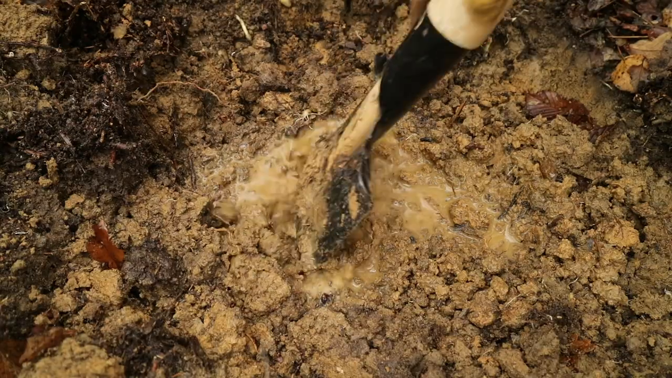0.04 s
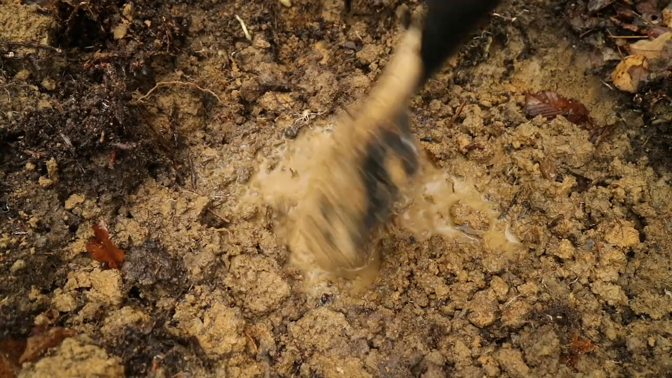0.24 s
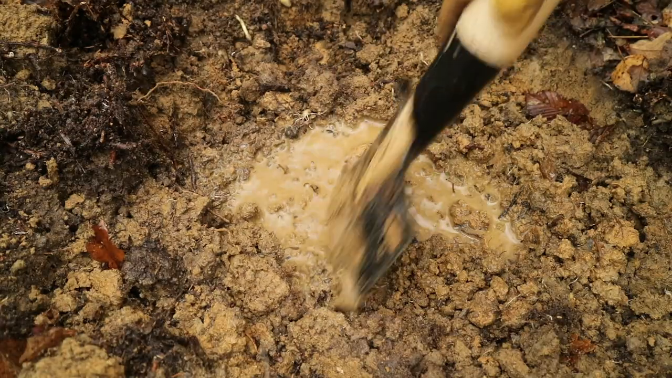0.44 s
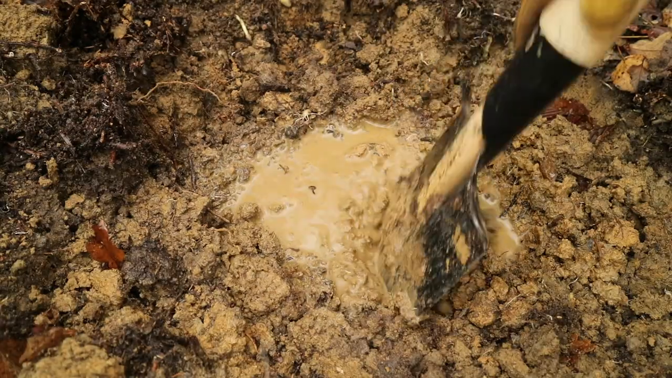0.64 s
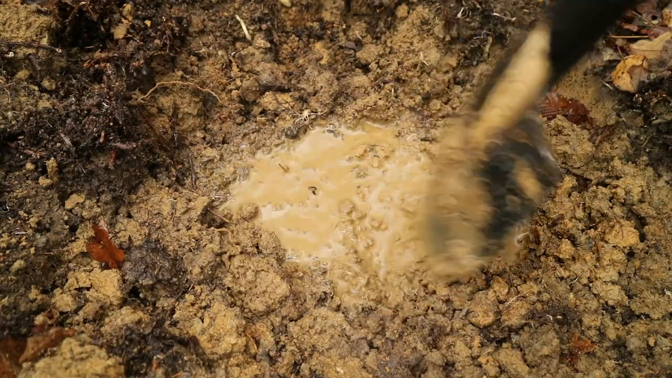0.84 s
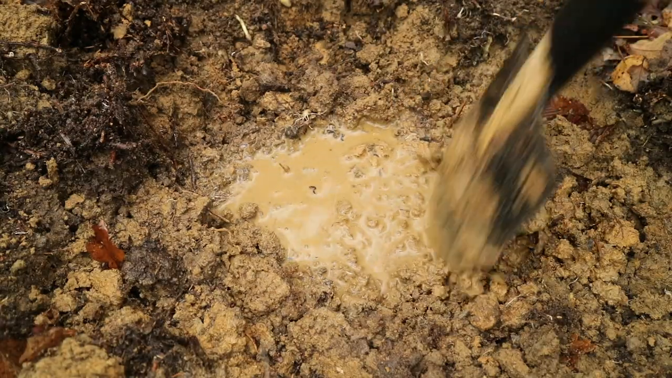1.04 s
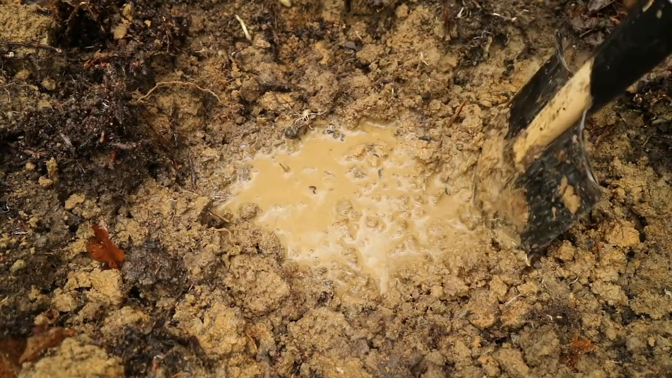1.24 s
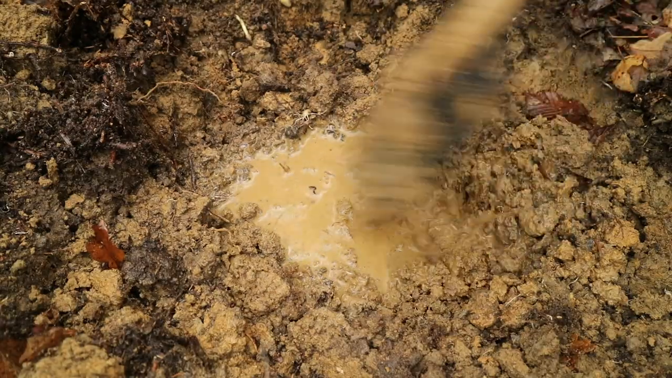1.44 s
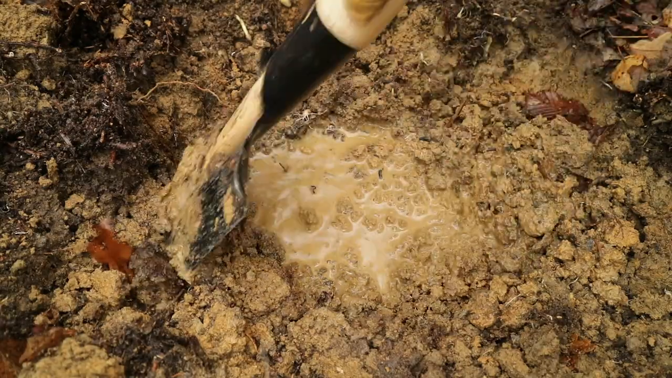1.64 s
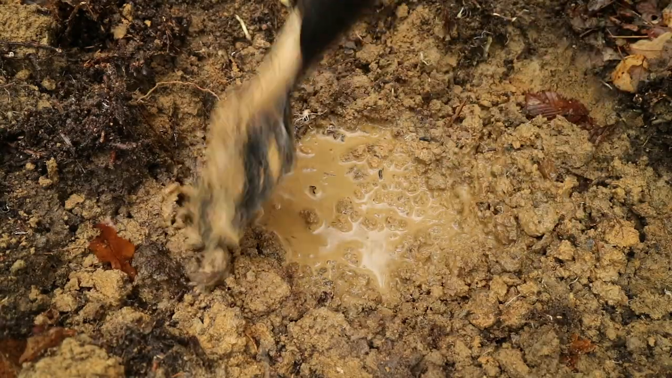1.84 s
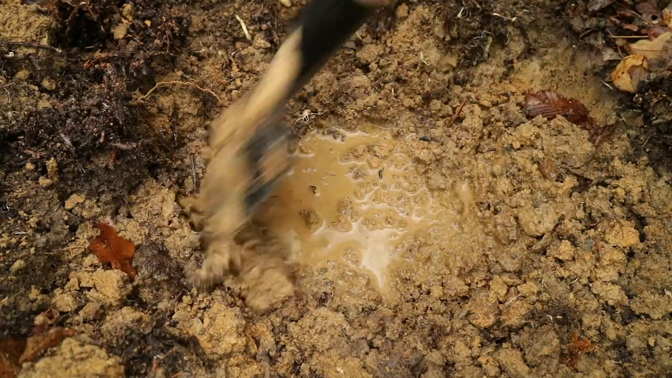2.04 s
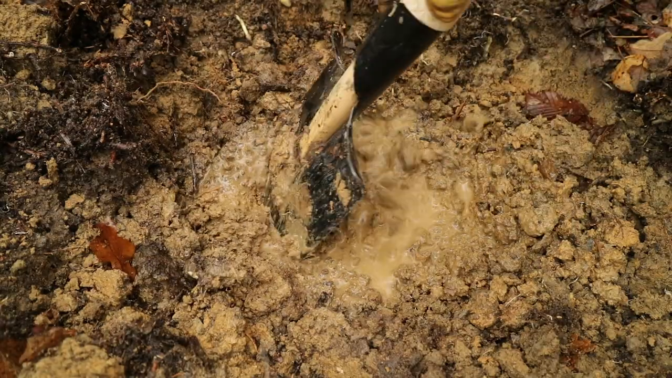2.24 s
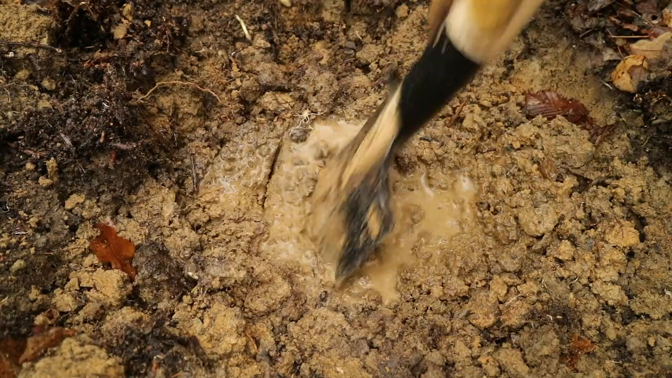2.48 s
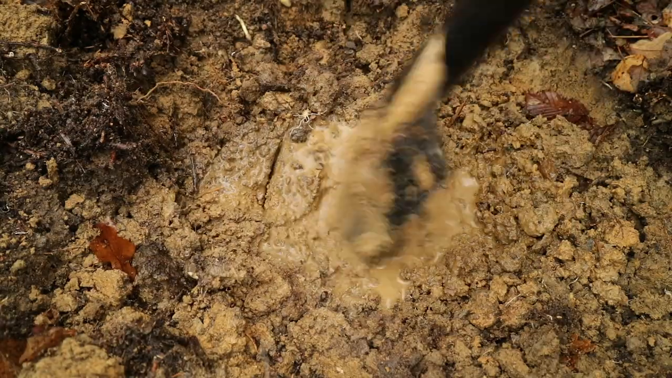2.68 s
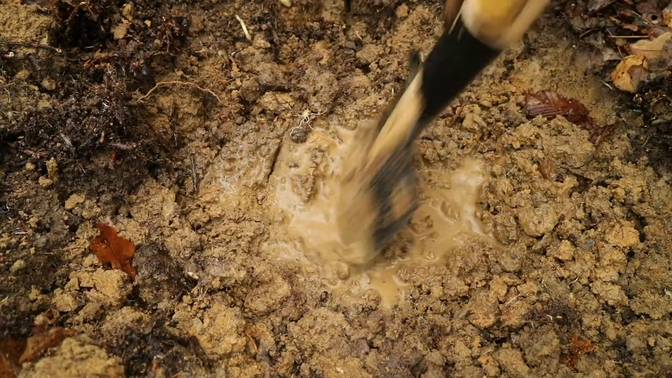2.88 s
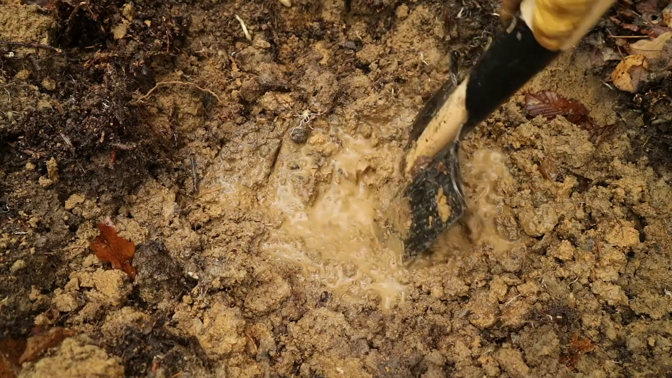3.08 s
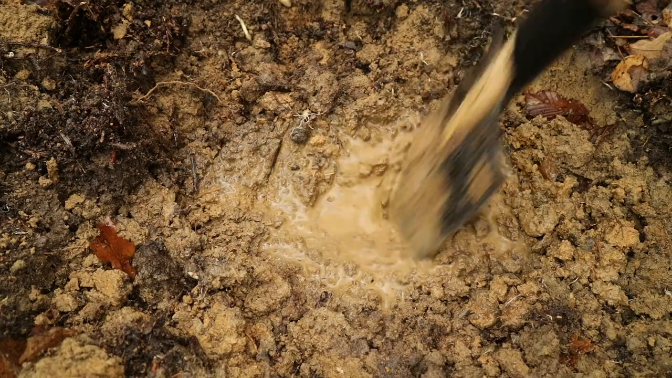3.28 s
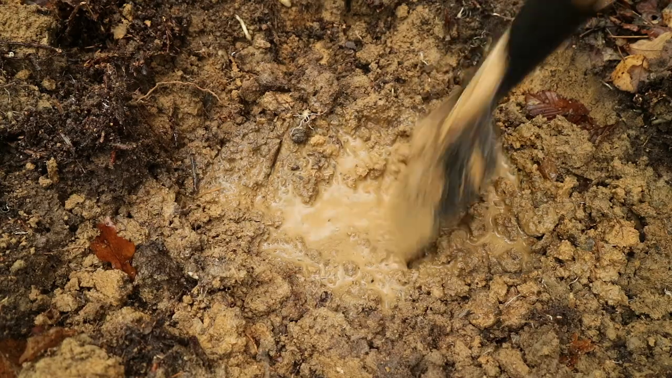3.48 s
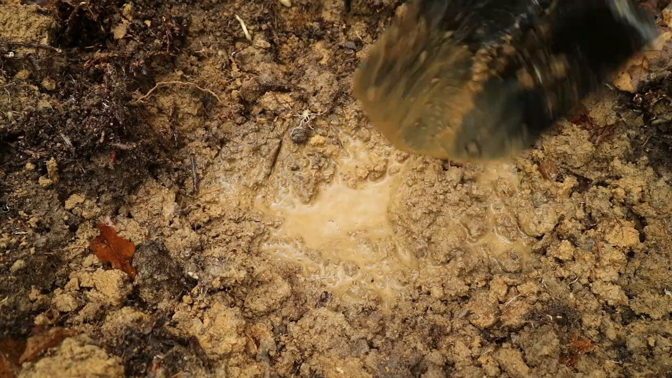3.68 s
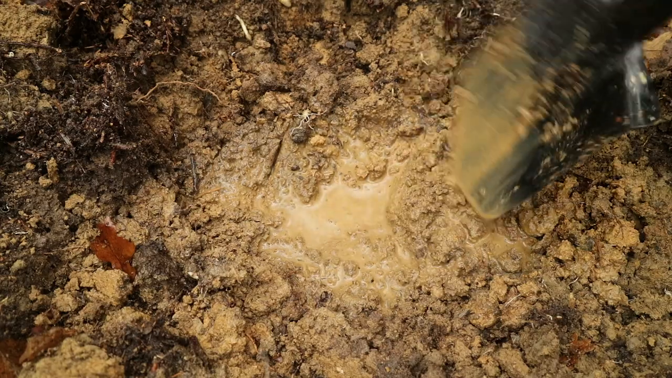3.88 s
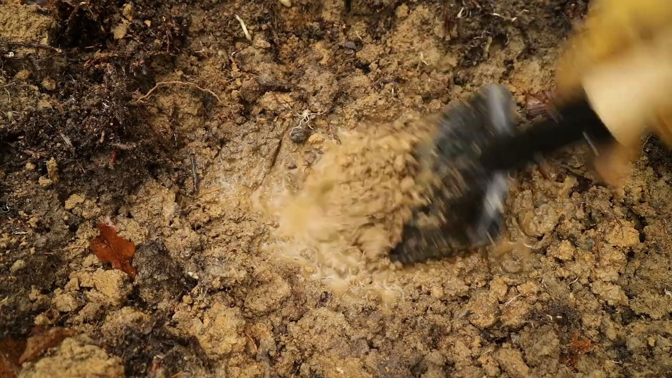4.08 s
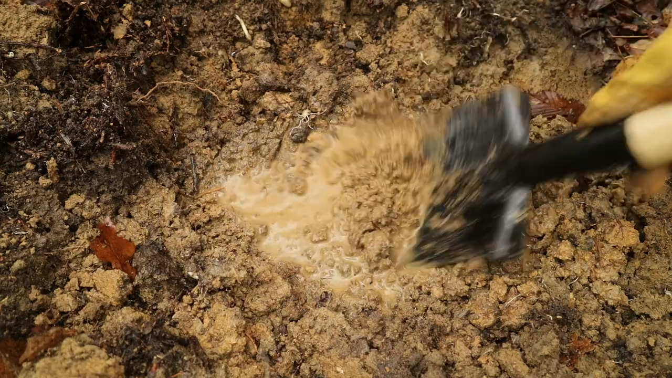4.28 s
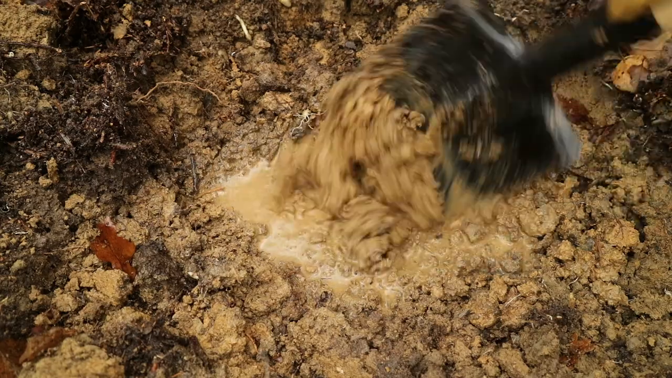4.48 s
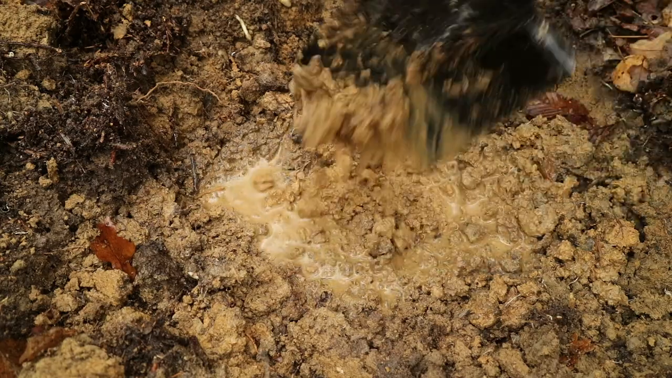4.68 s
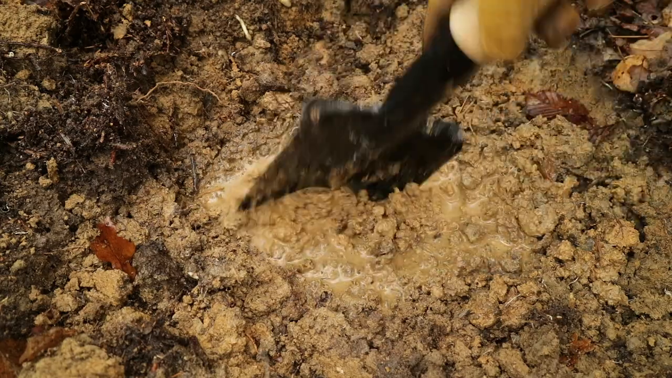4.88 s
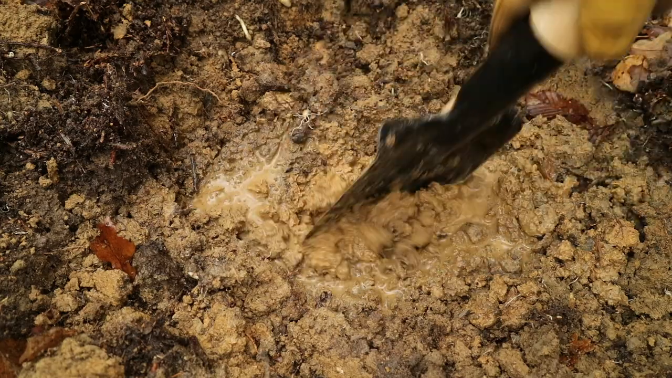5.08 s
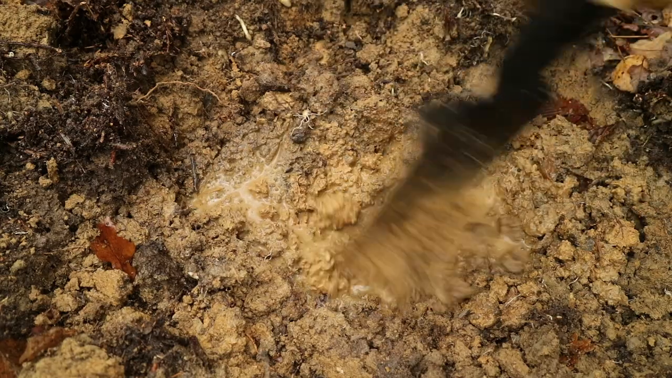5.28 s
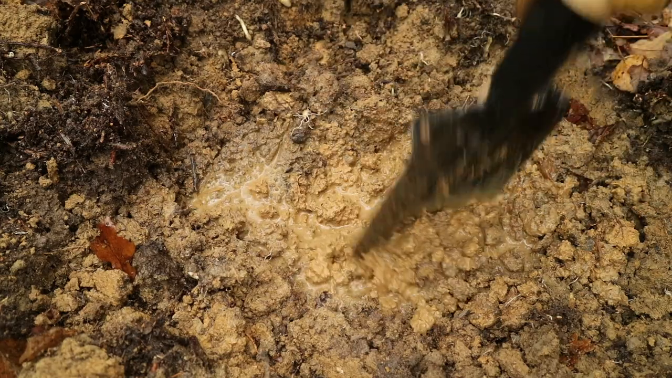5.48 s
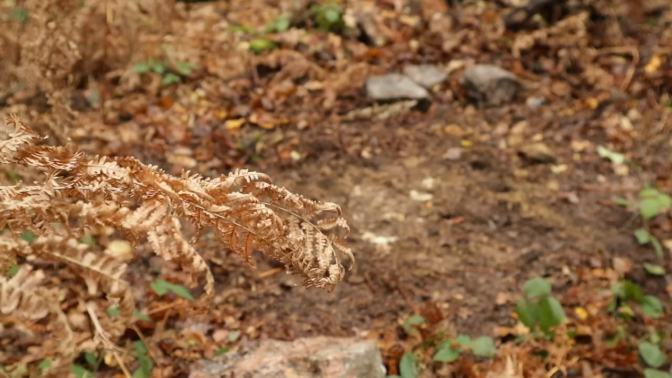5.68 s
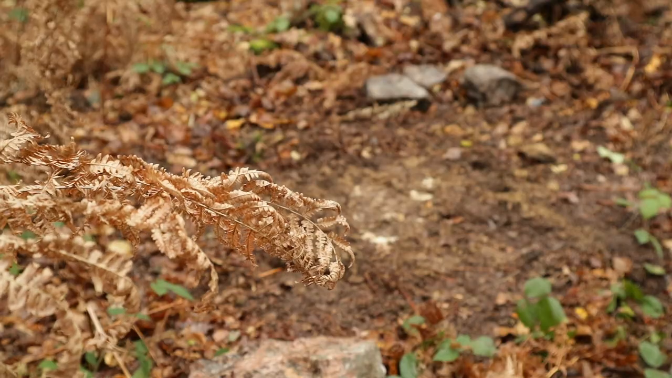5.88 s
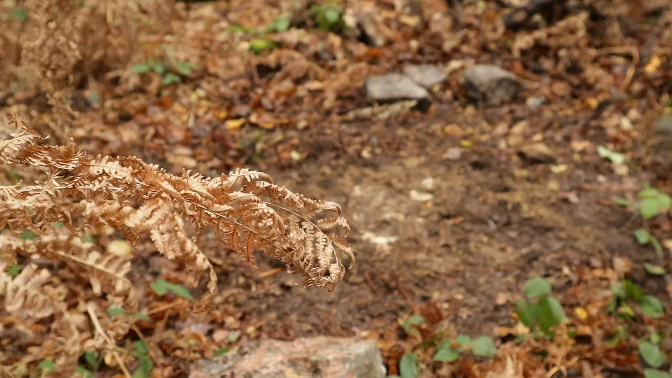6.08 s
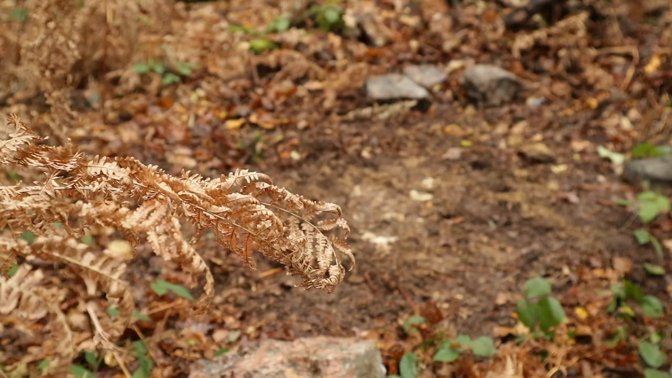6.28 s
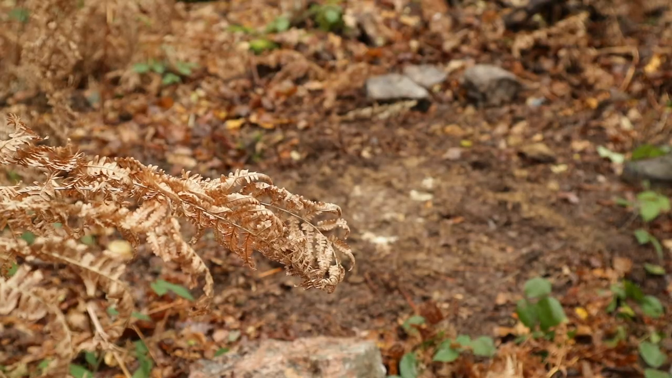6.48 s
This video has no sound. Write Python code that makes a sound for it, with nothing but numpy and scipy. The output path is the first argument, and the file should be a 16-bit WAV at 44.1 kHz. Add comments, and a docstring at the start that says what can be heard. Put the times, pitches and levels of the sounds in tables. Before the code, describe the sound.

A small shovel stabs and stirs wet gritty clay, with crisp scrapes, squelches and stone clinks, then stops to a faint outdoor rustle.

```python
"""Outdoors, close to a puddle of wet clay: a small shovel stabs and stirs the mud. Strokes swell and fade in
three layers: grit from clicks and rings, squelch from ringing air pockets, thud from low-filtered clicks.
Stones snap as filtered bursts with a ring; pops and knocks are gliding sines. Fizz, drips and crumbs are
filtered noise, rings and clicks over a noise wash. After the digging, a faint rustle and a few small taps and
knocks are heard."""
import sys
import numpy as np
from scipy import signal
from scipy.fft import rfft, irfft
from scipy.io import wavfile
from scipy.ndimage import uniform_filter1d, map_coordinates

SR = 44100
rng = np.random.default_rng(int(sys.argv[2]) if len(sys.argv) > 2 else 0)


def digitize_waveform(pressure):
    """Quantize a signal to 16-bit integers and store it at the path in sys.argv[1].

    Rows of a 2-D input are taken as channels; values are limited to [-1, 1].
    """
    field = np.atleast_2d(pressure).T
    bounded = np.clip(field, -1, 1)
    quanta = np.round(bounded * 32767).astype(np.int16)
    wavfile.write(sys.argv[1], SR, quanta)


N = 288414


def gain_of(db):
    """Decibels to amplitude."""
    return 10 ** (np.asarray(db) / 20)


def evened(x):
    """Scales to an rms of 1."""
    return x / np.sqrt(np.mean(x ** 2) + 1e-20)


def decay(t_s, t60_s):
    """Exponential decay, 60 dB down after t60_s."""
    return np.exp(-np.log(1000) * t_s / t60_s)


def level_curve(points):
    """Level in dB at every sample, linear between (time_s, level_db) points."""
    return np.interp(np.arange(N) / SR, *np.transpose(points))


def add(mix, start_s, sound):
    """Mixes a sound in at a time."""
    part = mix[max(round(start_s * SR), 0):][:len(sound)]
    part += sound[:len(part)]


def coloured(x, points, size=4096):
    """Minimum-phase filter with the given spectrum, so that clicks keep their sharp fronts."""
    hz, db = np.transpose(points)
    bin_hz = abs(np.fft.fftfreq(size, 1 / SR)) + 1
    log_gain = np.log(gain_of(np.interp(np.log(bin_hz), np.log(hz), db)))
    taps = np.fft.ifft(np.exp(signal.hilbert(log_gain).conj())).real
    return signal.oaconvolve(x, taps[:size // 2])[:len(x)]


def wander(rate_hz):
    """Smooth random motion of rms 1."""
    hz = np.fft.rfftfreq(N, 1 / SR)
    return evened(irfft(rfft(rng.standard_normal(N)) / (1 + (hz / rate_hz) ** 4), N))


def steadied(x, window_s):
    """Evens out the slow level and keeps the fine grain."""
    power = abs(uniform_filter1d(x ** 2, int(window_s * SR) + 1))
    return x / np.sqrt(power + np.mean(x ** 2) / 100)


def clicks(per_s, spread_db):
    """Random impulses: many small, a few large."""
    size = gain_of(spread_db * np.minimum(rng.exponential(1, N), 5))
    return size * rng.choice([-1, 1], N) * (rng.random(N) < per_s / SR)


def pocket(pitch_hz, t60_s, glide):
    """A decaying sine, like ringing air; its pitch rises with positive glide and falls with negative."""
    t = np.arange(int(t60_s * SR) + 2) / SR
    return np.sin(2 * np.pi * pitch_hz * t * (1 + glide * t / t60_s)) * decay(t, t60_s)


def pockets(low_hz, high_hz, cycles, per_s, spread_db, count=24):
    """A swarm of bursting air pockets in count sizes, each ringing for the same number of cycles."""
    swarm = np.zeros(N)
    for hz in np.geomspace(low_hz, high_hz, count):
        bursts = clicks(per_s / count, spread_db)
        swarm += hz ** 1.5 * signal.oaconvolve(bursts, pocket(hz, cycles / hz, 0.15))[:N]
    return evened(swarm)


def mirrored(x, strength=0.27, shortest_ms=1.5, sway=0.143, count=3):
    """Blade and pit walls throw the sound back from changing distances, which hollows it."""
    at, out = np.arange(N), x
    for k in range(count):
        delay = shortest_ms / 1000 * SR * 1.7 ** k * (1 + sway * wander(rate_hz=3))  # samples
        out = out + (-1) ** k * strength * map_coordinates(x, [at - delay], order=3)
    return out / np.sqrt(1 + count * strength ** 2)


# outdoor wash spectrum: freq_hz [Hz], density_db [dB per Hz]
WASH_COLOUR = [(30, -2.5), (120, 0), (200, -1), (330, 2), (1100, 2), (1600, -2.5), (2600, -10), (5000, -30),
               (16000, -30)]
# spectrum of the wide noise, low outdoor wash with faint hiss on top: freq_hz [Hz], density_db [dB per Hz]
WIDE_COLOUR = [(30, -9), (100, 7), (180, 14), (600, 14), (1100, 1.5), (2200, -15), (6000, -23), (16000, -8)]
# wash level, dipping between about 4 and 5 s: time_s [s], level_db [dB]
WASH_LEVEL = [(0, -57), (3.2, -56), (3.95, -57), (4.48, -61), (4.8, -62.5), (5.04, -55.5), (6.22, -52.5),
              (6.54, -57)]


def wash(wide_db=-15.0):
    """Filtered noise in the centre, plus a second noise in opposite phase left and right for width."""
    wash_db = level_curve(WASH_LEVEL)
    centre = evened(coloured(rng.standard_normal(N), WASH_COLOUR)) * gain_of(wash_db)
    wide = evened(coloured(rng.standard_normal(N), WIDE_COLOUR)) * gain_of(wash_db + wide_db)
    return centre + np.array([wide, -wide])


# fizz spectrum: freq_hz [Hz], density_db [dB per Hz]
FIZZ_COLOUR = [(1000, -6.5), (2200, -1.5), (2650, -3), (3300, -2.5), (4600, -3.5), (7000, -8), (7900, -4.5),
               (9500, -11), (13000, -12), (16000, -15)]
# fizz level, ending in a faint rustle: time_s [s], level_db [dB]
FIZZ_LEVEL_CURVE = [(0, -52.5), (1.15, -52), (1.5, -55.5), (1.95, -54.5), (2.3, -50), (2.6, -51.5),
                    (3.4, -50.5), (3.75, -56), (4.15, -52.5), (4.28, -65), (4.62, -56.5), (4.82, -57),
                    (5.05, -49.5), (5.58, -52.5), (5.75, -56), (6.0, -57.5), (6.2, -52.5), (6.54, -60.5)]


def fizz(froth_gain=0.74, flicker_db=1.55):
    """Tiny bursting bubbles and noise; the level flickers at random."""
    froth = steadied(pockets(1550, 13500, cycles=11, per_s=500, spread_db=2.5), window_s=0.12)
    hiss = coloured(rng.standard_normal(N) + froth_gain * froth, FIZZ_COLOUR)
    level_db = level_curve(FIZZ_LEVEL_CURVE) + flicker_db * wander(rate_hz=23)
    return evened(mirrored(hiss)) * gain_of(level_db)


def drips(offset_db=-3.5):
    """Sparse larger air pockets; their level follows the mean of fizz and wash in dB."""
    rings = pockets(440, 3270, cycles=6.8, per_s=60, spread_db=5.0)
    level_db = (level_curve(FIZZ_LEVEL_CURVE) + level_curve(WASH_LEVEL)) / 2 + offset_db
    return steadied(coloured(rings, SQUELCH_COLOUR), window_s=1.0) * gain_of(level_db)


def crumbs(offset_db=-7):
    """Ticking crumbs: sparse grit-coloured clicks that follow the fizz level."""
    ticks = coloured(clicks(per_s=18, spread_db=1.5), GRIT_COLOUR)
    return evened(mirrored(ticks)) * gain_of(level_curve(FIZZ_LEVEL_CURVE) + offset_db)


# blade driven into the mud, levels at full depth:
# start_s [s], push_s [s], grit_db [dB], squelch_db [dB], thud_db [dB]
STAB_STROKES = [(0.034, 0.058, -27, -31.5, -40.5), (0.338, 0.066, -35, -35.5, -38),
                (0.675, 0.028, -31.5, -28, -33), (0.936, 0.054, -31, -27, -36),
                (1.197, 0.067, -34, -29, -39.5), (1.641, 0.042, -28, -28.5, -38),
                (1.95, 0.036, -28.5, -26, -35.5), (2.143, 0.13, -36, -34.5, -41.5),
                (2.521, 0.033, -29.5, -32, -36), (2.803, 0.043, -31.5, -34, -33.5),
                (3.065, 0.042, -32, -32.5, -38.5), (3.371, 0.01, -28, -25, -25.5),
                (4.067, 0.04, -29, -18, -31), (4.87, 0.063, -36.5, -37, -41.5),
                (5.146, 0.023, -44, -37, -41)]


def stabs(layer, entry_db, release_s=0.041):
    """One layer of each stab; entry_db is the level at first touch against full depth."""
    column = {"grit": 2, "squelch": 3, "thud": 4}[layer]
    return [(row[0], row[1], release_s, row[column] + entry_db, row[column]) for row in STAB_STROKES]


def pressure(strokes, fall_db=30, attack_s=0.0087):
    """Amplitude over strokes (start_s, push_s, release_s, entry_db, deep_db): bite, push, come to rest."""
    t, power = np.arange(0, N, 16) / SR, 0
    for start_s, push_s, release_s, entry_db, deep_db in strokes:
        knees_s = start_s + np.array([-attack_s, 0, push_s, push_s + release_s, push_s + 2 * release_s])
        knees_db = [entry_db - fall_db, entry_db, deep_db, deep_db - fall_db, deep_db - 2 * fall_db]
        power += gain_of(np.interp(t, knees_s, knees_db, -np.inf, -np.inf)) ** 2
    return np.interp(np.arange(N) / SR, t, np.sqrt(power))


# grit spectrum: freq_hz [Hz], density_db [dB per Hz]
GRIT_COLOUR = [(700, -21.5), (1500, -12.5), (2300, -3), (2600, -6.5), (3100, -4.5), (3700, -5), (4600, -11),
               (5600, -11.5), (7700, -8), (9700, -19), (13000, -15), (16000, -26.5)]


def grit(slips):
    """Dense sand clicks and small high rings scrape along the blade from the first touch."""
    sand = 1.02 * evened(clicks(per_s=11000, spread_db=1.5))
    sand += pockets(1700, 10150, cycles=12.5, per_s=1500, spread_db=3.0)
    strokes = stabs("grit", entry_db=-1) + scrapes(offset_db=0) + splats(offset_db=-9.5)
    return steadied(coloured(sand * slips, GRIT_COLOUR), window_s=0.0436) * pressure(strokes)


# squelch spectrum: freq_hz [Hz], density_db [dB per Hz]
SQUELCH_COLOUR = [(150, -14), (350, -6), (550, -4.5), (750, 2.5), (1350, 2.5), (1700, 0), (2400, -6),
                  (3500, -4.5), (7000, -28)]


def squelch(slips):
    """Air squeezed out of the mud: a swarm of pockets, louder as the blade sinks in."""
    mud = pockets(288, 3620, cycles=10.1, per_s=1000, spread_db=3.0)
    strokes = stabs("squelch", entry_db=-7) + scrapes(offset_db=-5) + splats(offset_db=0)
    return steadied(coloured(mud * slips, SQUELCH_COLOUR), window_s=0.022) * pressure(strokes)


# thud spectrum: freq_hz [Hz], density_db [dB per Hz]
THUD_COLOUR = [(40, -13), (90, -12.5), (130, 2.5), (200, -8.5), (300, 7), (500, 1), (1000, -20.5)]


def thud(slips):
    """Lumps of mud give way as low-filtered clicks, louder as the blade sinks in."""
    lumps = clicks(per_s=900, spread_db=0.5)
    strokes = stabs("thud", entry_db=-11) + scrapes(offset_db=-19) + splats(offset_db=-24)
    return steadied(coloured(lumps * slips, THUD_COLOUR), window_s=0.035) * pressure(strokes, fall_db=26.5)


def shovel(slip_db=3.7):
    """The clay sticks and gives way: one random level motion shared by grit, squelch and thud."""
    slips = gain_of(slip_db * wander(rate_hz=220))
    return mirrored(grit(slips) + squelch(slips) + thud(slips))


# stones hitting the blade and mud slapping shut:
# start_s [s], level_db [dB peak], pitch_hz [Hz], t60_s [s]
SNAP_HITS = [(0.040, -9, 3750, 0.0023), (0.061, -21, 2670, 0.011), (0.095, -14.5, 2700, 0.0061),
             (0.116, -21, 3300, 0.0071), (0.333, -15, 3280, 0.008), (0.343, -19.5, 3100, 0.0084),
             (0.403, -15, 2920, 0.0046), (0.635, -28, 3900, 0.0081), (0.96, -14.5, 2920, 0.049),
             (0.998, -4, 1720, 0.0093), (1.229, -11.5, 903, 0.029), (1.234, -14.5, 3040, 0.027),
             (1.245, -13, 3960, 0.016), (1.273, -16.5, 2180, 0.022), (1.903, -5, 3040, 0.022),
             (1.926, -15.5, 3110, 0.033), (2.062, -19.5, 2440, 0.027), (2.272, -16.5, 1060, 0.011),
             (2.511, -20.5, 3000, 0.031), (2.808, -11.5, 3540, 0.0031), (2.822, -21, 3730, 0.014),
             (3.074, -17.5, 2380, 0.01), (3.376, -8.5, 3480, 0.016), (3.378, -9.5, 1410, 0.019),
             (4.086, -10, 2240, 0.012), (4.098, -1, 3020, 0.021), (4.103, -6, 3170, 0.022),
             (4.107, -5.5, 2176, 0.024), (4.11, -15, 1220, 0.028), (4.33, -25, 1930, 0.018),
             (4.521, -20, 1860, 0.0075), (4.858, -16, 1920, 0.01), (4.872, -12.5, 2970, 0.0069),
             (5.087, -16.5, 3600, 0.012), (5.315, -30, 4030, 0.02)]


def snaps(ring=0.8, body=0.21, crack_share=0.83, contact_s=0.000038, dull_hz=8500):
    """A crack of grit with one short ring; the harder the blow, the briefer the contact and sharper the front."""
    out, t = np.zeros(N), np.arange(2048) / SR
    cushion = signal.butter(1, min(dull_hz, SR / 3), fs=SR)
    for start_s, level_db, pitch_hz, t60_s in SNAP_HITS:
        burst = rng.choice([-1, 1], len(t)) * decay(t, crack_share * t60_s)
        crack = evened(coloured(signal.lfilter(*cushion, burst), GRIT_COLOUR))
        crack += body * evened(coloured(burst, SQUELCH_COLOUR))
        crack /= abs(crack).max()
        add(crack, 0, ring * pocket(pitch_hz, t60_s, -0.031))
        crack *= 1 - np.exp(-t * gain_of(level_db) / contact_s)
        add(out, start_s, gain_of(level_db) * crack / abs(crack).max())
    return out


# short ringing pops, the last perhaps a twig or footstep tick: start_s [s], level_db [dB], pitch_hz [Hz]
RINGING_POPS = [(0.144, -33, 2100), (0.477, -36, 870), (0.6, -33.5, 835), (0.768, -32, 2040),
                (1.368, -29.5, 1190), (1.733, -31.5, 950), (1.8, -34, 1040), (2.32, -32.5, 2930),
                (2.426, -34, 1870), (2.737, -31, 1480), (2.77, -26, 3600), (3.282, -32.5, 3280),
                (3.485, -32, 1480), (3.5, -22, 1920), (4.554, -33, 1790), (4.814, -35, 714),
                (6.149, -33.5, 786)]


def pops(splash=0.57, t60_s=0.018):
    """Short sines ring with rising pitch, each with a short noise spray."""
    out = np.zeros(N)
    for start_s, level_db, pitch_hz in RINGING_POPS:
        spray = rng.standard_normal(512) * np.exp(-np.arange(512) / SR / 0.002)
        spray = coloured(spray, FIZZ_COLOUR) + coloured(spray, SQUELCH_COLOUR)
        add(out, start_s, gain_of(level_db) * pocket(pitch_hz, t60_s, 0.11))
        add(out, start_s, gain_of(level_db) * splash * spray)
    return out


# blade drawn back or dragged sideways over grit: start_s [s], swell_s [s], grit_db [dB]
SCRAPE_STROKES = [(0.19, 0.074, -46), (0.496, 0.039, -46), (0.636, 0.022, -37.5), (0.762, 0.07, -44),
                  (1.045, 0.021, -36), (1.161, 0.055, -39.5), (1.329, 0.073, -40.5), (1.781, 0.021, -39),
                  (1.909, 0.019, -28), (2.049, 0.014, -34.5), (2.09, 0.14, -40.5), (2.368, 0.019, -36.5),
                  (2.647, 0.03, -37), (2.781, 0.022, -34), (2.958, 0.023, -39.5), (3.227, 0.0046, -38),
                  (3.332, 0.026, -34.5), (3.501, 0.052, -41.5), (4.006, 0.015, -29), (4.044, 0.025, -33.5),
                  (4.552, 0.044, -49.5), (5.027, 0.05, -48.5), (5.235, 0.011, -44.5), (5.339, 0.048, -39.5),
                  (5.395, 0.027, -41.5), (5.507, 0.037, -41.5)]


def scrapes(offset_db, entry_db=-5.5, release_s=0.055):
    """Scrapes swell and fade; offset_db is against the grit, as a shallow blade moves little mud."""
    return [(start_s, swell_s, release_s, db + offset_db + entry_db, db + offset_db)
            for start_s, swell_s, db in SCRAPE_STROKES]


# dull knocks on the ground: start_s [s], level_db [dB], pitch_hz [Hz]
GROUND_KNOCKS = [(0.405, -26.5, 203), (1.274, -19, 288), (2.268, -12, 456), (2.847, -19, 178),
                 (3.105, -28, 137), (3.378, -13, 348), (3.396, -20.5, 134), (4.101, -8, 363),
                 (4.333, -16.5, 535), (6.212, -32, 139)]


def knocks(sag=0.057, cycles=5.35):
    """Low sines sag in pitch and die within a few cycles; soft ground yields slowly, rounding the front."""
    out = np.zeros(N)
    for start_s, level_db, pitch_hz in GROUND_KNOCKS:
        knock = pocket(pitch_hz, cycles / pitch_hz, -sag)
        front = 1 - np.exp(-np.arange(len(knock)) * pitch_hz / SR * 2)
        add(out, start_s, gain_of(level_db) * knock * front)
    return out


# short wet splats and, at the end, small taps: start_s [s], squelch_db [dB]
SPLATS_AND_TAPS = [(2.412, -41), (3.397, -33), (3.782, -38), (4.329, -32), (4.454, -49.5), (4.522, -37),
                   (4.579, -40), (4.649, -56), (5.089, -36.5), (6.046, -33), (6.148, -45)]


def splats(offset_db, hold_s=0.0019, release_s=0.037):
    """Splats and taps start at full strength; offset_db is against the squelch."""
    return [(start_s, hold_s, release_s, db + offset_db, db + offset_db) for start_s, db in SPLATS_AND_TAPS]


def pit(x, t60_s=0.07, wet_db=-17):
    """Brief scatter from the sides of the pit and the ground around: decaying noise echoes."""
    t = np.arange(SR // 4) / SR
    taps = rng.standard_normal(len(t)) * decay(t, t60_s) * (t > 0.002)
    return x + gain_of(wet_db) * signal.oaconvolve(x, taps / np.linalg.norm(taps))[:N]


def scene():
    """Digging, pops and knocks dead centre with scatter, over the fizzing ground and the wide wash."""
    digging = pit(shovel() + snaps() + pops() + knocks())
    return digging + fizz() + drips() + crumbs() + wash()


def record(dry, low_cut_hz=70, ceiling=0.85, edge_hz=16100):
    """The microphone's low cut, a soft ceiling on peaks, and the recorder's band limit."""
    thin = signal.sosfilt(signal.butter(2, low_cut_hz, "high", fs=SR, output="sos"), dry)
    held = thin / (1 + (thin / ceiling) ** 6) ** (1 / 6)
    band = signal.firwin(401, edge_hz, window=("kaiser", 8), fs=SR)
    return signal.oaconvolve(held, band[None], "same")


dry = scene()
out = record(dry)
digitize_waveform(out)
```